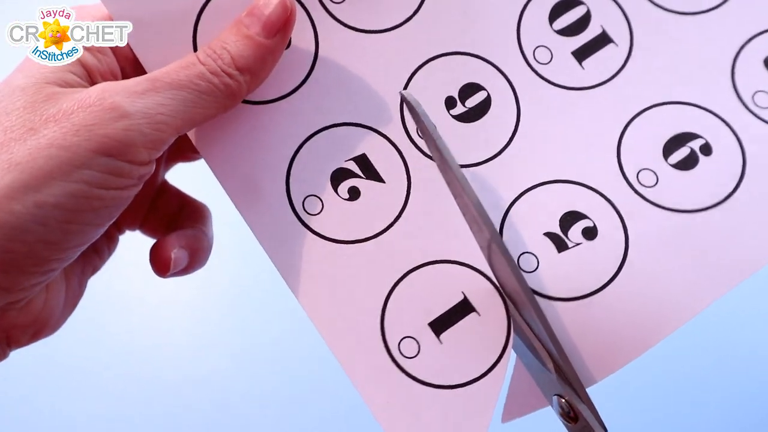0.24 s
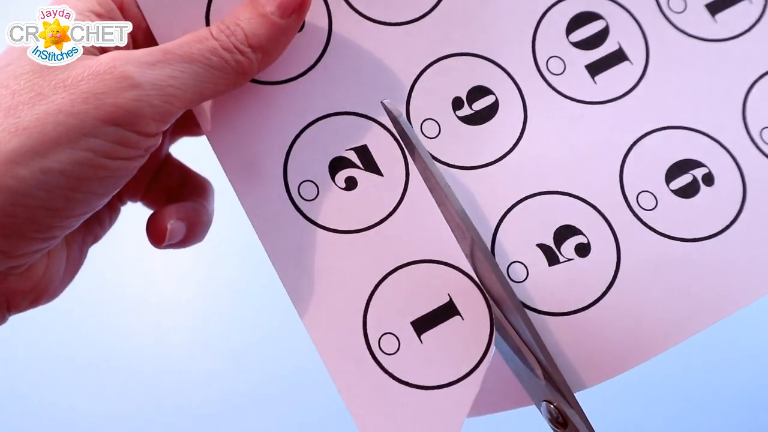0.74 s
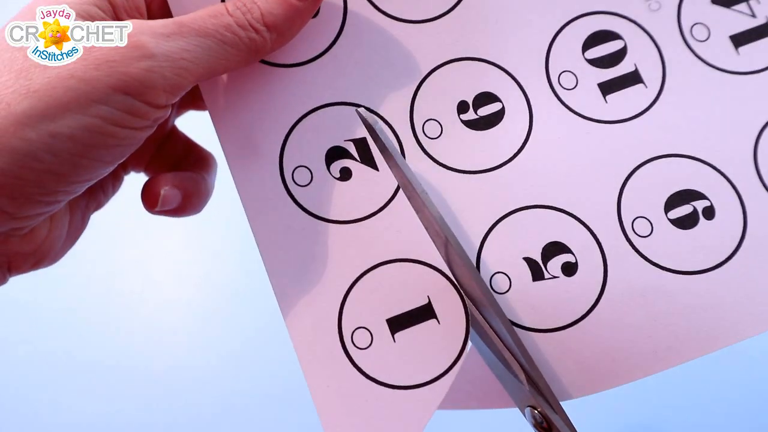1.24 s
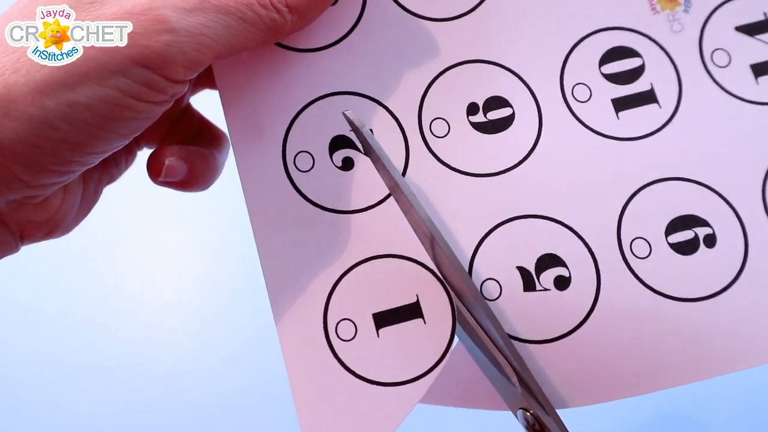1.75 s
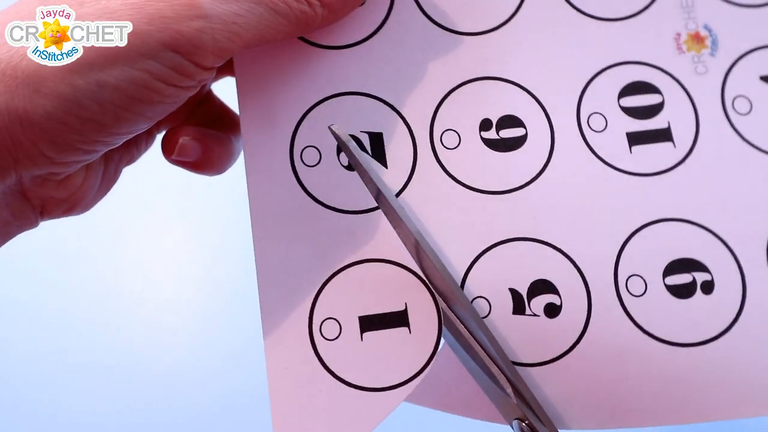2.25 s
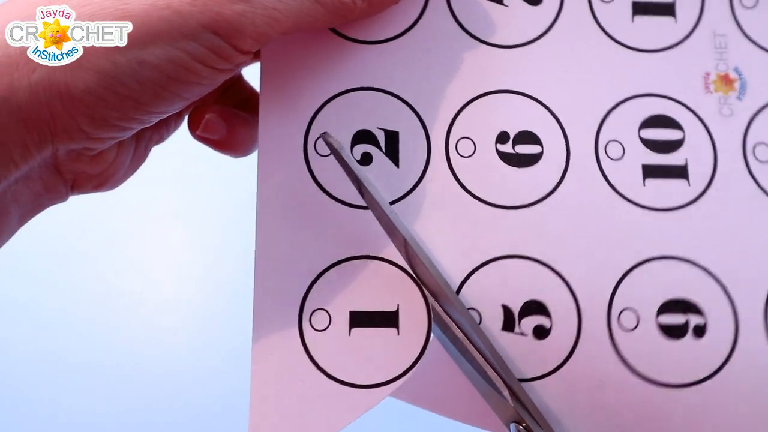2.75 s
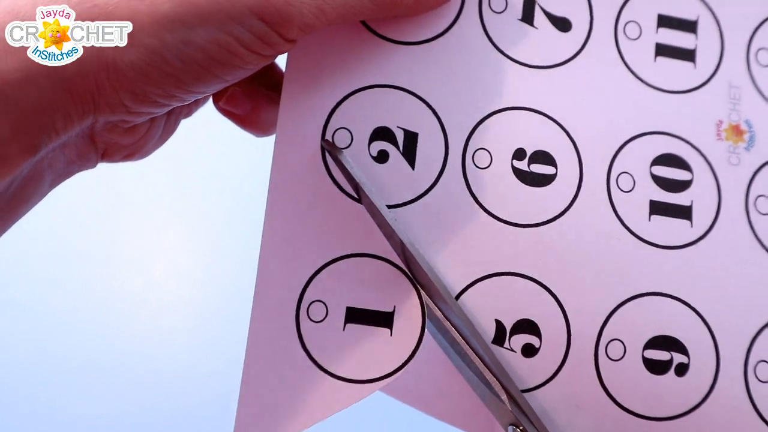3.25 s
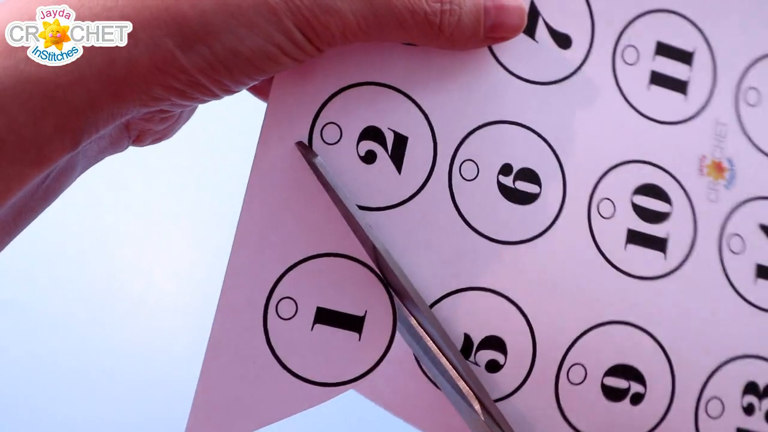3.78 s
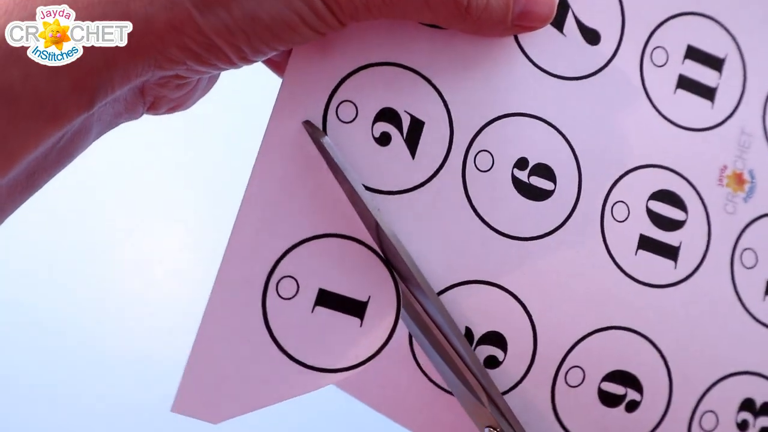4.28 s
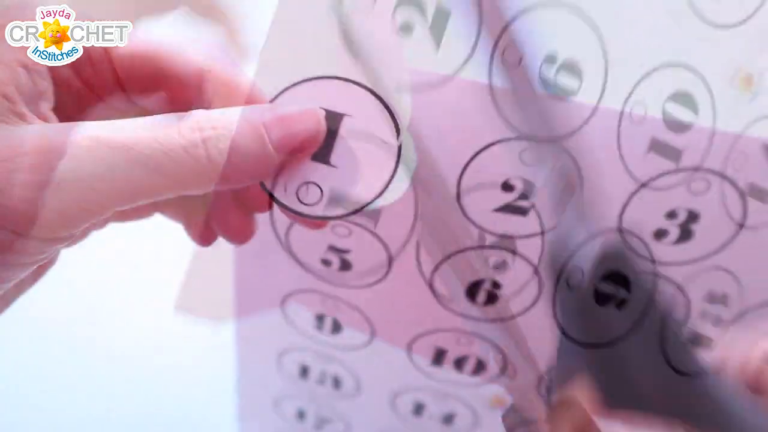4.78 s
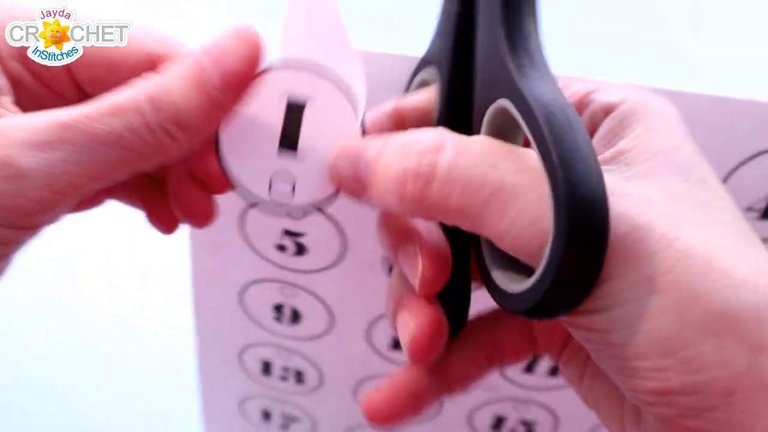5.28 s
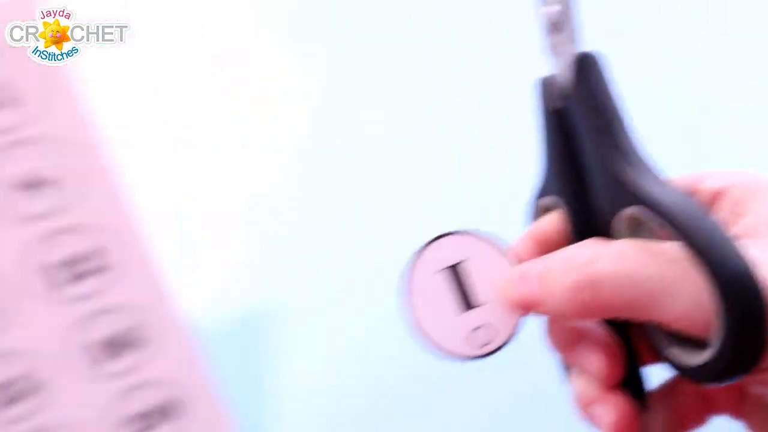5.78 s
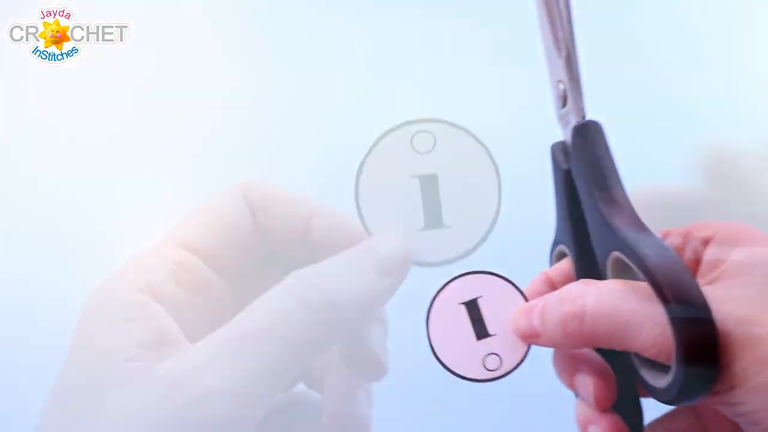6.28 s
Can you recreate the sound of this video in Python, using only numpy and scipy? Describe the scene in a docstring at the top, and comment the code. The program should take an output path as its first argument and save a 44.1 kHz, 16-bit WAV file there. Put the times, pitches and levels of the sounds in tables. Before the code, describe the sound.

Scissors nibble around a shape in a stiff sheet of paper, close to a stereo microphone in a quiet room. Crisp, uneven snips come in quick clusters with a slight ring of steel, while the sheet flexes with soft, low wobbles. The cuts grow sparser, with a few short tearing strokes. After some bright creases, the sheet flaps down on the table and slides away with a long, fading hiss.

```python
"""A quiet room: scissors nibble round a shape on a stiff sheet held close to a stereo microphone.
Each bite is a clump of fibre snaps that rings the sheet and the steel and drums the sheet's low modes.
Longer strokes tear, the blades rub between bites, and the hands flex the sheet and shake the table.
At the end the sheet flaps down and slides away over the table with a long friction hiss."""
import sys
import numpy as np
from scipy import signal
from scipy.fft import rfft, irfft
from scipy.io import wavfile
from scipy.ndimage import uniform_filter1d

SR = 44100
rng = np.random.default_rng(int(sys.argv[2]) if len(sys.argv) > 2 else 0)


def unload_audio(sound):
    """Save the sound as a 16-bit wav file, at the path given as the first command line argument."""
    columns = np.transpose(np.atleast_2d(sound))
    # keep every value between -1 and 1, then stretch to whole-number steps
    steps = np.round(np.clip(columns, -1, 1) * 32767)
    wavfile.write(sys.argv[1], SR, steps.astype(np.int16))


N = 287789

# the crisp treble of parting fibres: freq_hz, level_db
CRISP_SPECTRUM = [(2000, -53.5), (3500, 4), (5100, 5), (6500, -1.5), (7500, -7.5), (10600, -9.5),
                  (12500, -24), (15000, -57)]
# bites grow duller as the cut deepens, then the freed sheet creases brightly: time_s, crisp_db
CRISPNESS_CURVE = [(0, -13), (1.2, -13), (2.3, -14.5), (4.0, -13.5), (4.3, -21.5), (4.7, -30.5), (4.85, -7),
                   (6.53, -14.5)]
# the hands at work: time_s, sheet_flex_db, table_shake_db
HAND_MOTION = [(0, -52, -59), (.8, -79, -53.5), (1.3, -53, -52.5), (2.5, -50.5, -51.5), (3.0, -52, -47.5),
               (3.4, -66, -59.5), (3.7, -56, -47.5), (4.3, -69, -54.5), (4.6, -82, -50), (5.4, -59, -65),
               (5.6, -50, -56), (5.9, -56, -59.5), (6.53, -66.5, -57.5)]


def scissor_bites():
    """Each clump of breaking fibres drives a papery snap, a steel ring, crisp treble and a low drumming."""
    # bites and creases: peak_s, level_db, decay_s, pitch_hz, swell_s
    bites = [(0.027, -29, 0.022, 1760, 0.0011), (0.06, -36, 0.015, 1970, 0.0012),
             (0.114, -18.5, 0.012, 1890, 0.000848), (0.135, -29.5, 0.013, 1120, 0.0032),
             (0.1736, -28, 0.0099, 2130, 0.0016), (.237, -18.5, 0.017, 2360, 0.0031),
             (0.4207, -28, 0.0099, 1970, 0.0011), (0.428, -19.5, 0.011, 2180, 0.0039),
             (.451, -20.5, 0.03, 1760, 0.0015), (0.4585, -19, 0.01, 2900, 0.0014),
             (0.4645, -21.5, 0.023, 1830, 0.004), (0.485, -28, 0.01, 1770, 0.0052),
             (0.5425, -15.5, 0.0041, 1860, 0.0032), (0.577, -21.5, 0.044, 2330, 0.005),
             (.678, -25.5, 0.022, 1110, 0.0054), (0.714, -16, 0.019, 2530, 0.0028),
             (0.781, -28, 0.022, 1950, 0.0042), (0.7997, -21, 0.018, 1190, 0.0093),
             (0.99, -19.5, 0.029, 1340, 0.0029), (1.002, -26.5, 0.018, 1830, 0.0021),
             (1.0703, -34, 0.0153, 1750, 0.0019), (1.1025, -27.5, 0.015, 2500, 0.0017),
             (1.2224, -22, 0.069, 2400, 0.0047), (1.233, -21.5, 0.028, 2230, 0.01),
             (1.2812, -31, 0.013, 2010, 0.001), (1.322, -32, 0.018, 2320, 0.0021),
             (1.3574, -33, 0.0157, 1730, 0.00052), (1.3854, -29, 0.0099, 1780, 0.0017),
             (1.44, -31.5, 0.0075, 1810, .0012), (1.453, -18.5, 0.028, 1580, 0.0022),
             (1.6245, -33, 0.026, 1550, 0.0096), (1.6772, -22.5, 0.033, 1500, 0.0076),
             (1.707, -26, 0.035, 1660, 0.0072), (1.7558, -32, 0.015, 1700, 0.0025),
             (1.826, -30.5, 0.043, 1000, 0.0034), (1.839, -32.5, 0.027, 1640, 0.00248),
             (1.86, -23.5, 0.0064, 1590, 0.00865), (1.9793, -39, 0.0095, 1180, 0.00152),
             (1.9986, -19, 0.06, 1890, 0.0047), (2.0865, -24.5, 0.024, 1580, 0.0034),
             (2.106, -26, 0.021, 1650, 0.0016), (2.1305, -22.5, 0.068, 1700, 0.0028),
             (2.2056, -24, 0.016, 1250, 0.0086), (2.218, -16.5, 0.054, 1330, 0.0016),
             (2.3484, -30, 0.0061, 1870, 0.0039), (2.368, -34, 0.011, 1490, 0.0027),
             (2.3932, -29.5, 0.038, 1750, 0.0039), (2.457, -38, 0.028, 1500, 0.0024),
             (2.499, -31, 0.055, 1980, 0.0039), (2.5431, -29, 0.047, 1570, 0.0059),
             (2.557, -19, 0.022, 1140, 0.0036), (2.593, -35.5, 0.011, 2500, 0.00084),
             (2.67, -13, 0.0037, 1150, 0.0059), (2.677, -27, 0.015, 1100, 0.0015),
             (2.7056, -14.5, 0.016, 1120, 0.0013), (2.7124, -21.5, 0.016, 1200, 0.0024),
             (2.74, -33, 0.027, 1110, 0.0041), (2.8417, -32.5, 0.0178, 1110, 0.0008),
             (2.9338, -27, 0.37, 1530, 0.00842), (2.979, -22.5, 0.079, 930, 0.0025),
             (3.172, -38, 0.0154, 992, 0.0011), (3.231, -35.5, 0.014, 2340, 0.00181),
             (3.2453, -31, 0.024, 1060, 0.0026), (3.259, -35, 0.029, 1390, 0.001475),
             (3.5859, -27, 0.13, 905, 0.0019), (3.6, -15.5, 0.031, 1150, 0.00064),
             (3.607, -21.5, 0.048, 1120, 0.0038), (3.6674, -32.5, 0.104, 1260, 0.0062),
             (3.9999, -13, 0.03, 1030, 0.004), (4.242, -29.5, 0.014, 1000, 0.0008),
             (4.3767, -11.5, 0.014, 2060, 0.00052), (4.406, -21.5, 0.0093, 1390, 0.0018),
             (4.424, -20, 0.0087, 2580, 0.00105), (4.4383, -18, 0.013, 1260, 0.001),
             (4.4417, -16, 0.02, 1270, 0.001453), (4.5274, -24, 0.011, 1030, 0.0015),
             (4.54, -28.5, 0.031, 1390, 0.0022), (4.5885, -33.5, 0.011, 2800, 0.004),
             (4.622, -33, 0.0087, 1290, 0.0037), (4.6486, -22.5, 0.017, 1600, 0.000742),
             (4.66, -39, 0.047, 1780, 0.00401), (4.859, -39, 0.023, 4860, 0.0021),
             (4.907, -25, 0.081, 2870, 0.0033), (4.914, -17, 0.022, 1240, 0.002),
             (5.1463, -34, 0.1, 980, .001), (5.249, -28, 0.018, 4170, 0.0052),
             (5.2764, -22, 0.024, 2100, 0.00095), (5.2811, -20.5, 0.0082, 3190, 0.0017),
             (5.522, -15, 0.012, 1350, 0.000836), (5.546, -34, 0.0113, 2500, 0.0015),
             (5.5742, -22.5, 0.023, 12100, 0.00545), (6.33, -37.5, 0.13, 1550, 0.0082),
             (6.42, -34.5, 0.095, 2280, 0.0011)]
    # steel modes of the blades: pitch_hz, width_hz, level_db
    blade_modes = [(3240, 330, 6), (5516, 600, -5), (6100, 320, -3.5), (6649, 57, -15)]
    # top edge of the sharpest creases: freq_hz, level_db
    spark_spectrum = [(5000, -23.5), (9000, 11), (12500, 5), (15500, 1)]
    crisp_db_per_octave, overtone_ratio = 4.5, 2.094
    grip_bend, grip_tilt_db_per_octave = .05, -8
    snap, crisp, spark, drumming, patch, steel = np.zeros((6, N))
    for peak_s, level_db, decay_s, pitch_hz, swell_s in bites:
        swell_s = np.clip(swell_s, .0005, .012)
        lead_s = 2 * swell_s + .004
        start_s = peak_s - lead_s
        clump = fibre_clump(lead_s, swell_s, decay_s)
        bend = 1 + grip_bend * rng.uniform(-0.8, 1)  # the grip shifts the low modes from bite to bite
        tilt = grip_tilt_db_per_octave * rng.random()  # a looser grip favours the lowest
        drum_db = -34.5 + 0.75 * (level_db + 24.5)
        add(drumming, start_s, sheet_drum(gain_of(drum_db) * clump, bend, tilt))
        # a sudden bite spends itself in one crack
        clump[round(lead_s * SR)] += 2.08 * (0.0067 / swell_s) ** 0.45
        clump *= gain_of(level_db)
        bright_db = np.interp(peak_s, *np.transpose(CRISPNESS_CURVE))
        cutoff_hz = np.clip(14100 * gain_of(0.58 * bright_db), 500, 18000)
        add(snap, start_s, signal.lfilter(*signal.butter(2, cutoff_hz, fs=SR), clump))
        add(steel, start_s, gain_of(0.63 * bright_db) * clump)
        crisp_db = bright_db + crisp_db_per_octave * np.log2(pitch_hz / 2000)
        add(crisp, start_s, gain_of(crisp_db) * clump)
        add(spark, start_s, gain_of(2 * crisp_db) * clump)
        # the patch next to the blades has its own pitch, clearer in light ticks than in hard bites
        patch_modes = [(pitch_hz, 450, 0), (pitch_hz, 120, -6), (overtone_ratio * pitch_hz, 300, -7)]
        add(patch, start_s, gain_of(-0.26 * (level_db + 26)) * ring(clump, patch_modes))
    return (gain_of(-10) * paper_snap(snap)
            + gain_of(-11.5) * thin(patch)
            + gain_of(-11.5) * ring(steel, blade_modes)
            + gain_of(-2.5) * colour(crisp, CRISP_SPECTRUM)
            + gain_of(-1.5) * colour(spark, spark_spectrum)
            + gain_of(2) * highpass(drumming, 130))


def fibre_clump(lead_s, swell_s, decay_s):
    """Fibres crackle up to a peak and die away; stray ones part before and after."""
    t = np.arange(7000) / SR - lead_s
    envelope = gain_of(np.where(t < 0, 12.8 * t / swell_s, -60 * t / np.clip(decay_s, .005, .3)))
    clump = fibre_snaps(len(t), per_s=5500, spread_db=1.5) * envelope
    clump *= np.linalg.norm(envelope) / np.linalg.norm(clump)  # the force of the bite sets its energy
    stray_db = -18.5 - 60 * np.where(t < 0, -0.014 * t / swell_s, t) / 0.13
    strays = fibre_snaps(len(t), 5000, 2.0) + fibre_snaps(len(t), 500, 3.5)
    return clump + gain_of(stray_db) * strays


def fibre_snaps(samples, per_s, spread_db):
    """Sparse snaps of either sign, a few of them large."""
    chance, size, polarity = rng.random((samples, 3)).T
    strength = gain_of(-spread_db * np.maximum(np.log(size + 1e-9), -4))
    return unit_rms(strength * np.sign(polarity - .5) * (chance < per_s / SR))


def paper_snap(force):
    """The broad snap of paper, part of it ringing in the sheet."""
    # body of the snap: freq_hz, level_db
    snap_spectrum = [(410, -60.5), (700, -9.5), (1260, 7), (1460, 0.5), (1690, 3), (3450, 0), (5000, -20.5),
                     (6500, -32.5), (11000, -120)]
    # upper modes of the sheet: pitch_hz, width_hz, level_db
    sheet_modes = [(1106, 136, 7), (1288.2, 12.8, -20), (1733, 17, -3), (2140, 230, -6.5), (2760, 210, -4),
                   (3570, 1100, 3)]
    return colour(force, snap_spectrum) + gain_of(-1.5) * thin(ring(force, sheet_modes))


def sheet_drum(force, bend=1, tilt_db_per_octave=0):
    """The sheet rings low like a drum skin; hanging free, it moves no deep bass."""
    # low modes of the sheet: pitch_hz, width_hz, level_db
    low_modes = [(166, 75, -7.5), (245.5, 60, -6.5), (318.6, 33, -4.5), (397, 33, -0.5), (479, 47, -5.5)]
    gripped = [(hz * bend, width, db + tilt_db_per_octave * np.log2(hz / 400))
               for hz, width, db in low_modes]
    return highpass(ring(force, gripped), 77)


def tearing_strokes():
    """A run of fibres parts under the blades; the hollow ring glides as the free flap changes."""
    # long strokes: start_s, length_s, level_db, first_pitch_hz, hollow_db
    strokes = [(2.451, 0.29, -52.5, 1080, -26.5), (2.923, 0.043, -37.5, 1160, 1),
               (2.98, 0.015, -44, 1290, 3), (3.015, 0.042, -42, 1070, -2.5),
               (3.19, 0.075, -56.5, 1230, -25), (3.596, 0.064, -41, 1150, 1), (3.835, 0.15, -46, 594, 9),
               (4.005, 0.057, -43.5, 960, -26), (4.389, 0.057, -47.5, 1300, -11),
               (4.526, 0.079, -55.5, 1080, 5), (5.468, 0.15, -48.5, 2600, -8)]
    last_pitch_hz, extra_crisp_db = 1090, 6.5
    out = np.zeros(N)
    for start_s, length_s, level_db, first_pitch_hz, hollow_db in strokes:
        progress = np.arange(round(length_s * SR) + 1500) / (length_s * SR)
        envelope = np.clip(np.minimum(progress / 0.12, (1 - progress) / 0.28), 0, 1)
        grit = fibre_snaps(len(progress), per_s=5000, spread_db=1.6) * envelope
        pitch_hz = first_pitch_hz + (last_pitch_hz - first_pitch_hz) * np.minimum(progress / 0.87, 1)
        flap = unit_rms(resonate(resonate(grit, pitch_hz, 730), pitch_hz, 730))
        flap *= gain_of(hollow_db) * np.clip((.9 - progress) / 0.31, 0, 1)
        grit *= np.minimum(progress, 1) ** (max(hollow_db, 0) / 12)  # a hollow stroke starts dull
        crisp_db = np.interp(start_s, *np.transpose(CRISPNESS_CURVE)) + extra_crisp_db
        treble = gain_of(crisp_db) * colour(grit, CRISP_SPECTRUM)
        add(out, start_s, gain_of(level_db) * (paper_snap(grit) + flap + treble))
    return out


def sheet_wobbles():
    """Soft pushes ring the sheet's low modes, most of all those nearest each push's pitch."""
    # the whole sheet wobbles: start_s, length_s, level_db, pitch_hz
    pushes = [(0.454, 0.025, -32, 403), (0.541, 0.026, -39.5, 330), (0.709, 0.036, -40, 228),
              (0.991, 0.031, -46.5, 402), (1.104, 0.035, -47, 404), (1.228, 0.038, -31, 365),
              (2.363, 0.038, -39.5, 493), (3.581, 0.01, -30.5, 487), (3.643, 0.032, -35, 364),
              (3.931, 0.042, -42, 350), (4.373, 0.011, -32, 493), (4.818, 0.062, -43.5, 313),
              (4.904, 0.088, -37.5, 399), (5.573, 0.064, -34, 326), (5.799, 0.028, -39.5, 199)]
    out = np.zeros(N)
    for start_s, length_s, level_db, pitch_hz in pushes:
        progress = np.arange(round(length_s * SR) + 3000) / (length_s * SR)
        envelope = np.clip(np.minimum(10 * progress, (1 - progress) / .3), 0, 1)
        push = rng.standard_normal(len(progress)) * envelope
        wobble = resonate(sheet_drum(push), np.full(len(push), pitch_hz), width_hz=300)
        add(out, start_s, gain_of(level_db) * wobble * np.sqrt(length_s * SR) / np.linalg.norm(wobble))
    return out


def blade_rub():
    """Dense small snaps as the blades press on, and the sheet flexing in the hands."""
    grit = gain_of(-51.5) * (fibre_snaps(N, 4000, 1.5) + .3 * fibre_snaps(N, 150, 2.5))
    crackle = gain_of(-9) * paper_snap(grit) + gain_of(-12) * colour(grit, CRISP_SPECTRUM)
    flexing = fader(HAND_MOTION, 1) * fibre_snaps(N, per_s=680, spread_db=6.6)
    return crackle + sheet_drum(flexing)


def sheet_slide():
    """Fine friction catches on the grain of the table; at speed the hiss brightens and the edge sings."""
    # the sheet brushes the table: time_s, level_db
    brush = [(5.13, -71), (5.15, -60), (5.26, -60), (5.33, -87)]
    # it lands, catches, shoots off and slows down: time_s, level_db
    skid = [(5.36, -85), (5.44, -56.5), (5.55, -62), (5.6, -37.5), (5.7, -43.5), (5.73, -35.5),
            (5.76, -35.5), (5.84, -38), (6.05, -42), (6.3, -49), (6.4, -65.5), (6.53, -69)]
    # friction hiss: freq_hz, level_db
    hiss_spectrum = [(350, -59), (600, -8), (741, -17), (1030, -3), (1140, -13), (1290, -2), (6020, -5),
                     (10800, -11.5), (12600, -18), (14000, -41)]
    # modes of the sliding edge: pitch_hz, width_hz, level_db
    edge_modes = [(2080, 200, -2), (4810, 300, -3), (5940, 220, 0), (6700, 350, -4)]
    catch_db = 1.2 * unit_rms(uniform_filter1d(rng.standard_normal(N), 500))
    speed = fader(brush, 1) + fader(skid, 1)
    friction = speed * gain_of(catch_db) * fibre_snaps(N, per_s=16000, spread_db=0.82)
    fast_friction = friction * (speed / speed.max()) ** 6.8
    hiss = (gain_of(3.5) * colour(friction, hiss_spectrum)
            + gain_of(-0.5) * ring(fast_friction, edge_modes)
            + gain_of(-7) * colour(fast_friction, CRISP_SPECTRUM))
    bands = signal.stft(hiss, nperseg=512)[2]
    patches = uniform_filter1d(rng.standard_normal(bands.shape), size=3, axis=0)
    scrape_db = 1.8 * unit_rms(uniform_filter1d(patches, size=21, axis=1))  # bands flare for a moment
    return signal.istft(bands * gain_of(scrape_db), nperseg=512)[1][:N]


def landing_thump():
    """The sheet flaps down and its soft push of air rings the table top."""
    # modes of the table top: pitch_hz, width_hz, level_db
    table_modes = [(137, 5.4, -5.5), (208, 35, -2.5)]
    push = np.zeros(N)
    add(push, start_s=5.59, sound=gain_of(-38) * np.hanning(round(0.007 * SR)))
    return highpass(ring(push, table_modes), 84)


def table_rumble():
    """The table carries the working hands as a low rumble."""
    spectrum = [(15, -34), (50, 0), (70, -3), (125, -1), (180, -11.5), (400, -116)]  # freq_hz, level_db
    return fader(HAND_MOTION, 2) * unit_rms(colour(rng.standard_normal(N), spectrum))


def reflections(sound, decay_times, delay_s):
    """Sparse echoes of random sign, each band dying at its own speed."""
    taps = np.zeros(SR // 2)
    slots = np.arange(round(delay_s * SR), len(taps) - 20, 20)
    taps[slots + rng.integers(0, 20, len(slots))] = rng.choice([-1., 1.], len(slots))
    hz, t, bands = signal.stft(taps, SR, nperseg=128)
    decay = gain_of(-60 * t / value_at(decay_times, hz)[:, None])
    return convolve(sound, signal.istft(bands * decay, SR, nperseg=128)[1])


def room_tone(spectrum, level_db):
    """Steady room noise and microphone hiss."""
    return gain_of(level_db) * unit_rms(equalise(rng.standard_normal(N), spectrum))


def ring(force, modes):
    """A force excites a set of damped modes."""
    t = np.arange(4000) / SR
    taps = sum(gain_of(db) * np.sqrt(width) * np.exp(-np.pi * width * t) * np.sin(2 * np.pi * hz * t)
               for hz, width, db in modes)
    return convolve(force, taps)


def resonate(x, pitch_hz, width_hz):
    """One resonance that follows a pitch curve."""
    turn = np.exp(2j * np.pi * np.cumsum(pitch_hz) / SR)
    pole = np.exp(-np.pi * width_hz / SR)
    return 2 * (turn * signal.lfilter([1 - pole], [1, -pole], x / turn)).real


def colour(x, spectrum):
    """Minimum-phase tone shaping: nothing sounds ahead of an attack."""
    log_gain = np.maximum(value_at(spectrum, np.fft.rfftfreq(4096, 1 / SR)), -80) * np.log(10) / 20
    mirrored = np.concatenate([log_gain, log_gain[-2:0:-1]])
    phase = -signal.hilbert(mirrored).imag
    return convolve(x, np.fft.ifft(np.exp(mirrored + 1j * phase)).real[:2048])


def equalise(x, spectrum):
    """Zero-phase EQ of a whole track."""
    return irfft(rfft(x) * gain_of(value_at(spectrum, np.fft.rfftfreq(N, 1 / SR))), N)


def convolve(x, taps):
    """Play x through a response scaled to unit energy."""
    return signal.oaconvolve(x, taps / np.linalg.norm(taps))[:len(x)]


def thin(x):
    """Small snaps move little air at low pitch."""
    return highpass(highpass(x, 600), 600)


def highpass(x, hz):
    return signal.sosfilt(signal.butter(2, hz, "high", fs=SR, output="sos"), x)


def fader(rows, column):
    """A dB column as a gain at every sample, silent outside the table."""
    rows = np.array(rows)
    return gain_of(np.interp(np.arange(N) / SR, rows[:, 0], rows[:, column], -200, -200))


def value_at(points, hz):
    """Interpolate along log frequency."""
    freq_hz, values = np.transpose(points)
    return np.interp(np.log(hz + 1), np.log(freq_hz + 1), values)


def gain_of(db):
    return 10 ** (np.asarray(db) / 20)


def unit_rms(x):
    return x / np.sqrt(np.mean(x ** 2) + 1e-20)


def add(mix, start_s, sound):
    part = mix[round(start_s * SR):][:len(sound)]
    part += sound[:len(part)]


def scene():
    """Mid and side pick-ups, mixed to stereo: the side hears the table's first reflections and the room."""
    # reverberation of the room: freq_hz, t60_s
    room_decay = [(200, 0.44), (1000, 0.14), (4000, 0.085), (12000, 0.15)]
    # sideways pick-up of near sounds: freq_hz, level_db
    side_spectrum = [(60, -51), (150, -19), (380, -27.5), (950, -17.5), (2380, -12.5), (5980, -2),
                     (15000, 6)]
    # room tone in the mid and in the side: freq_hz, level_db
    mid_air = [(15, -49.5), (34, -36), (54, 5), (87, -33), (175, -9.5), (563, -11), (610, -18.5),
               (755, -15.5), (862, -17.5), (14500, -48.5)]
    side_air = [(15, -59), (25, -22.5), (305, -6.5), (421, -8.5), (722, -9), (919, -10.5), (3170, -16.5),
                (15500, -37.5)]
    cutting = scissor_bites() + tearing_strokes() + sheet_wobbles() + blade_rub()
    sliding = sheet_slide()
    near = cutting + sliding
    mid = near + table_rumble() + landing_thump()
    mid += gain_of(-9) * reflections(near, room_decay, delay_s=.004)
    sideways = equalise(cutting, side_spectrum)
    off_table = reflections(sideways, [(200, 0.03), (12000, 0.023)], delay_s=.00022)
    off_walls = reflections(sideways, room_decay, delay_s=.004)
    far_edge = equalise(sheet_slide(), side_spectrum)  # the side hears other parts of the sliding sheet
    side = gain_of(-4.5) * off_table + gain_of(-7.5) * off_walls + gain_of(0.5) * far_edge
    side += .05 * sliding - .04 * cutting  # the hands are a little to the right, the sheet leaves left
    mid += room_tone(mid_air, level_db=-54)
    side += room_tone(side_air, level_db=-49)
    return np.array([mid + side, mid - side])


def record(dry):
    """The top treble softens, then cuts off steeply."""
    rolloff_hz, limit_hz = 13400, 15650
    softened = signal.sosfilt(signal.butter(4, rolloff_hz, fs=SR, output="sos"), dry)
    band_limit = signal.firwin(511, limit_hz, window=("kaiser", 9), fs=SR)
    return signal.oaconvolve(softened, band_limit[None], "same")


dry = scene()
out = record(dry)
unload_audio(out)
```